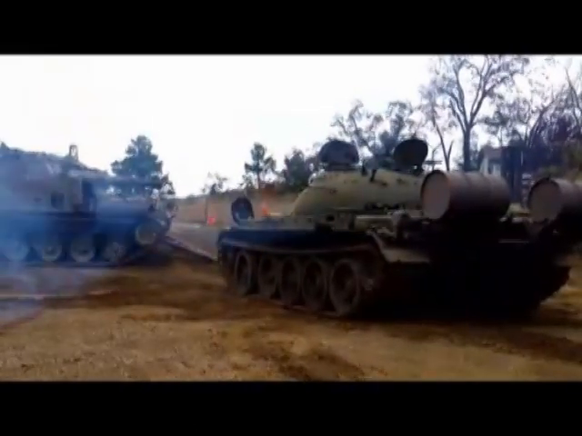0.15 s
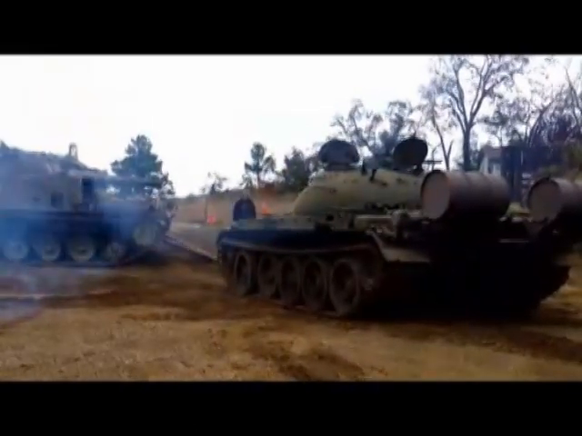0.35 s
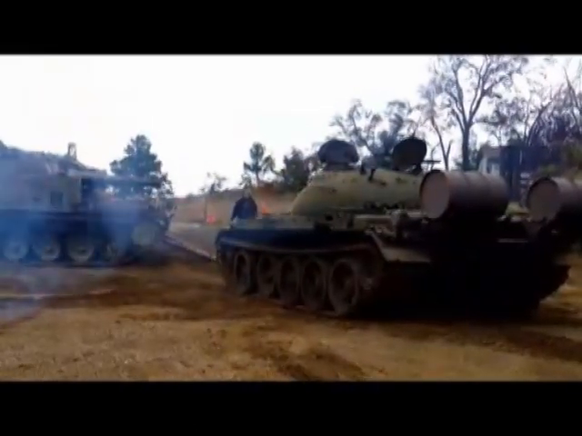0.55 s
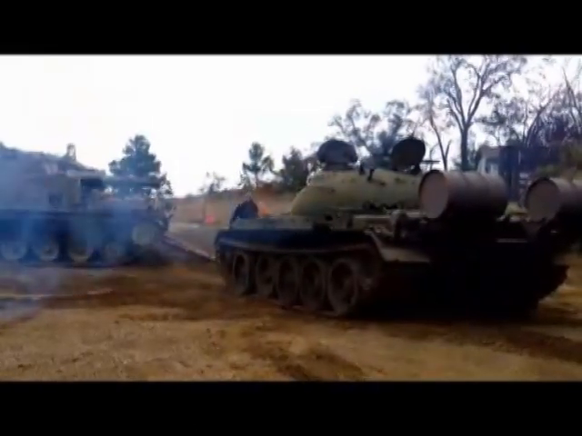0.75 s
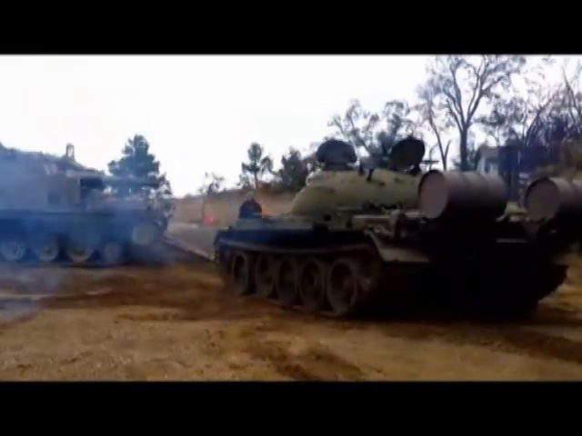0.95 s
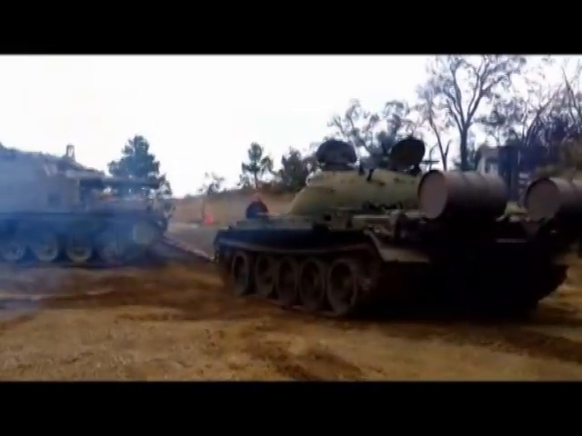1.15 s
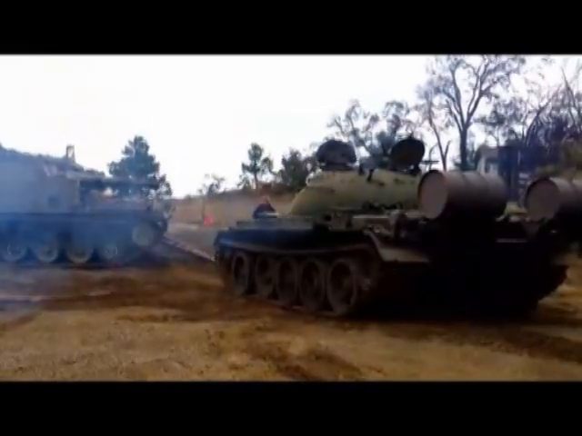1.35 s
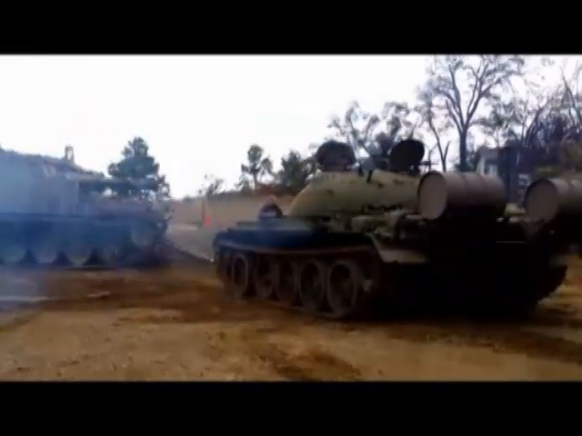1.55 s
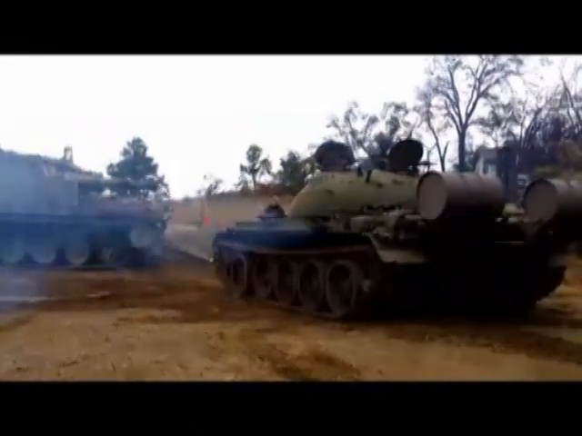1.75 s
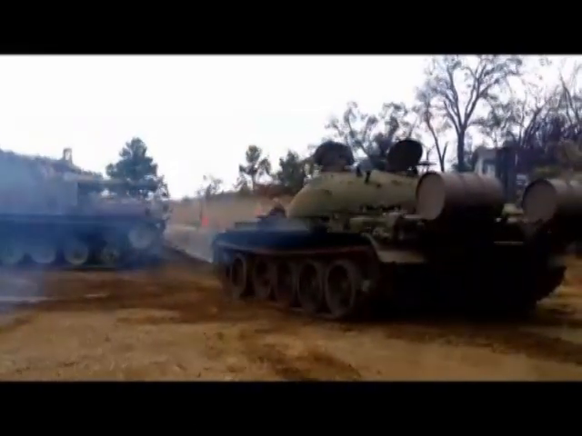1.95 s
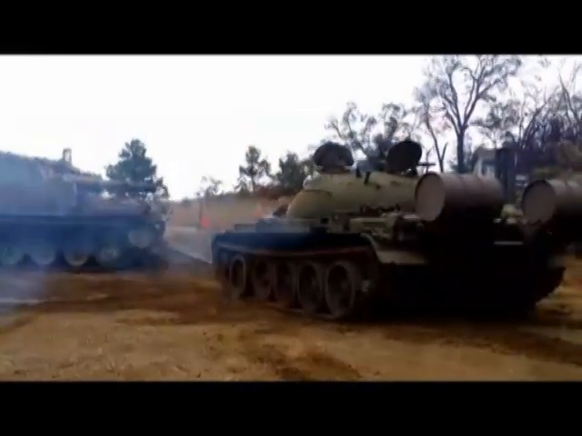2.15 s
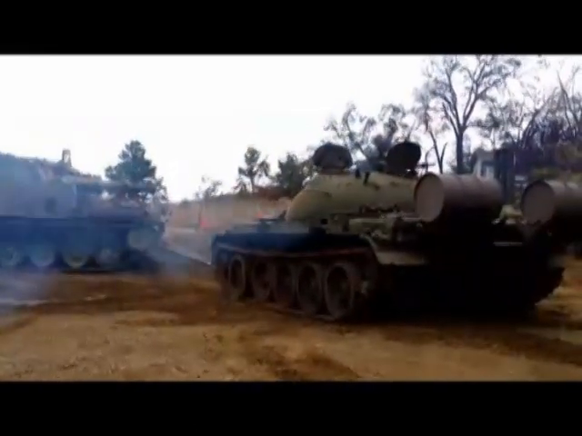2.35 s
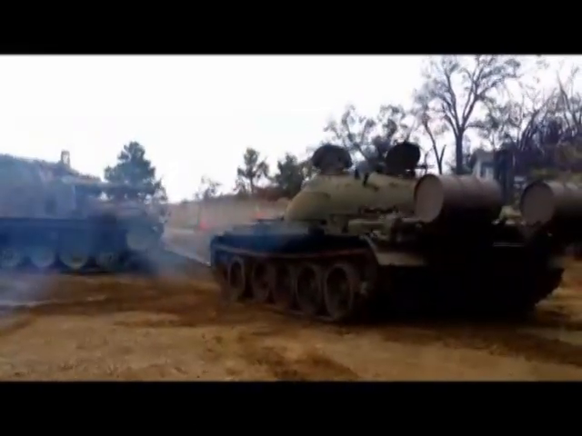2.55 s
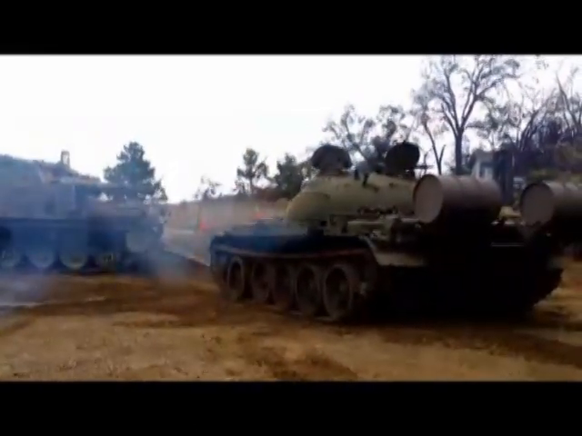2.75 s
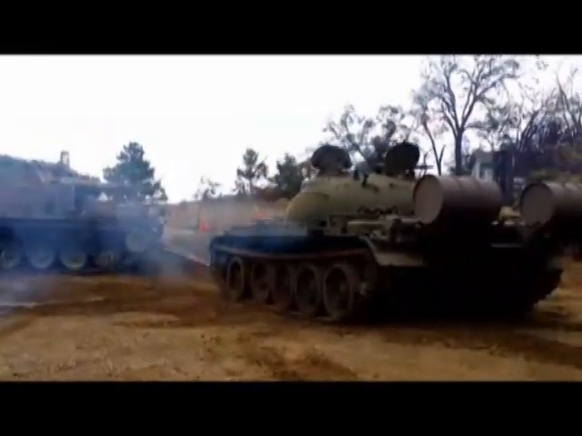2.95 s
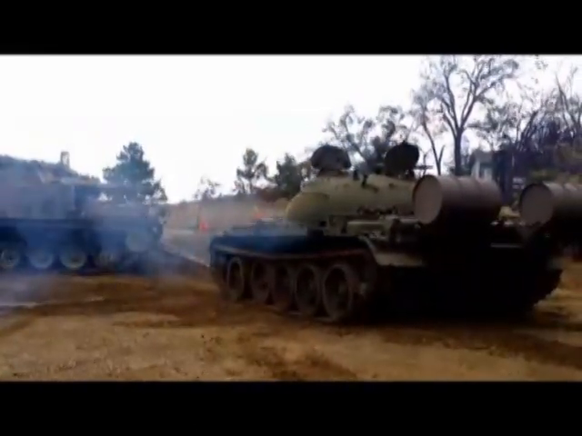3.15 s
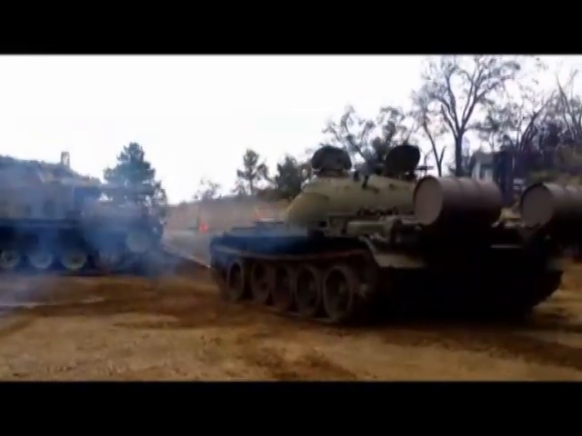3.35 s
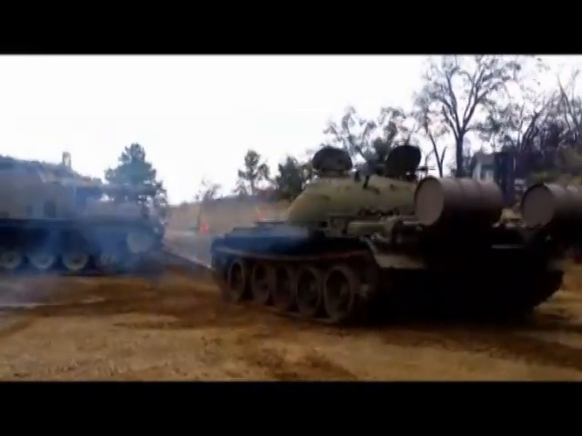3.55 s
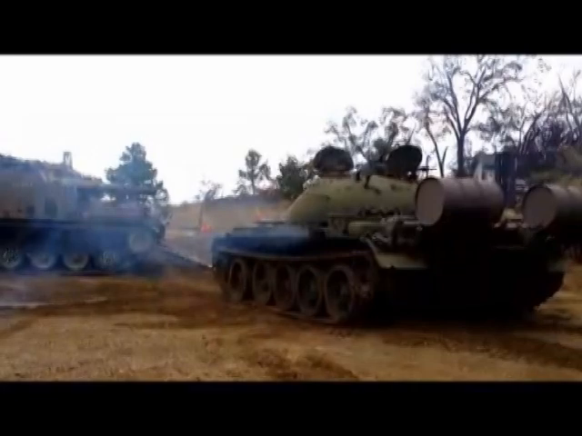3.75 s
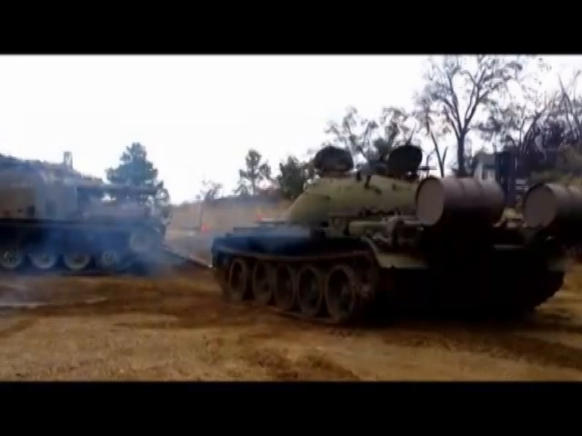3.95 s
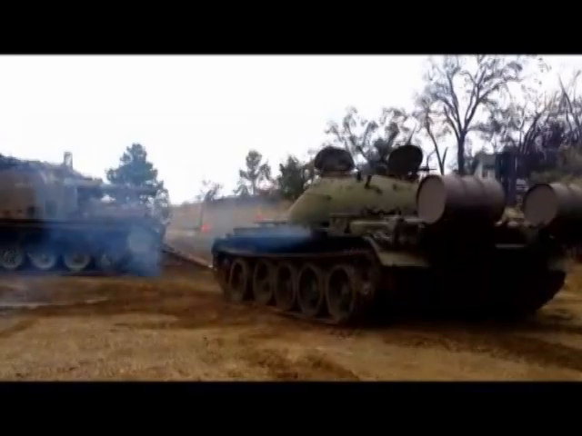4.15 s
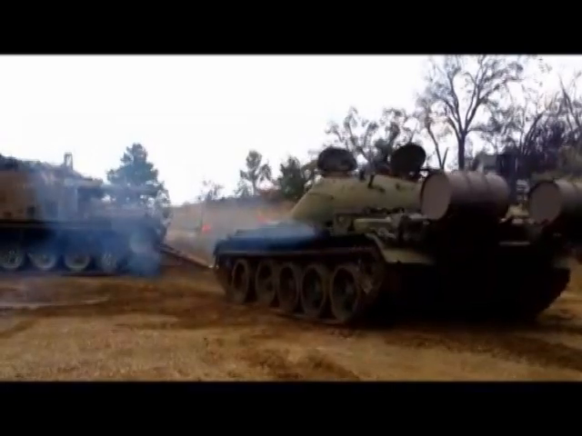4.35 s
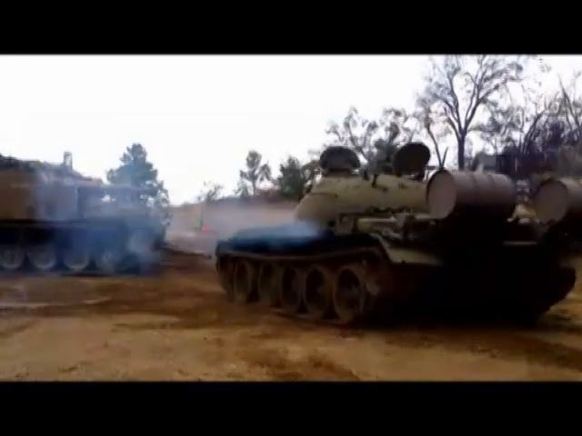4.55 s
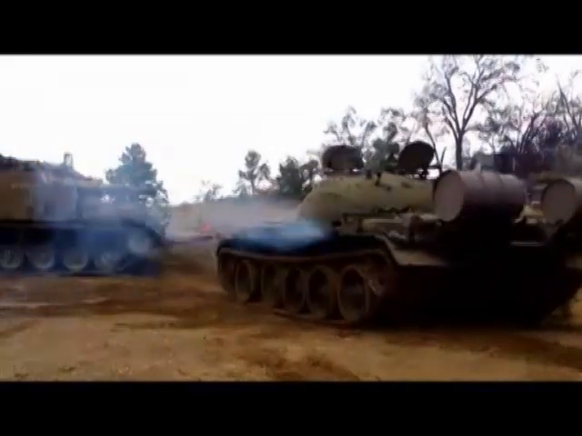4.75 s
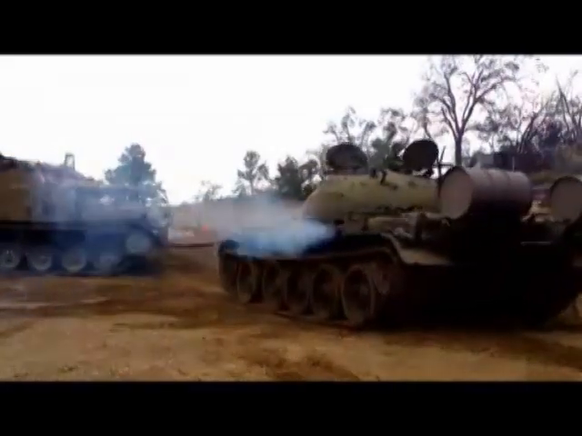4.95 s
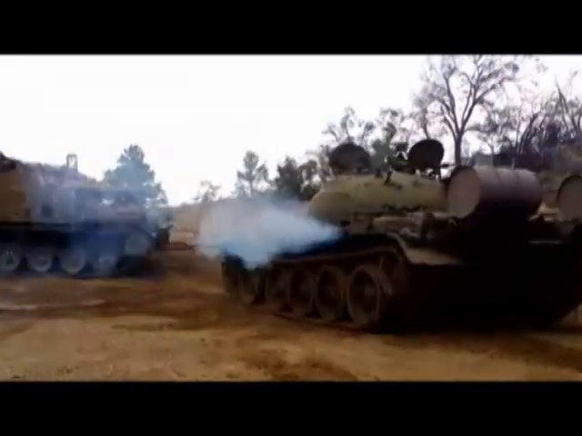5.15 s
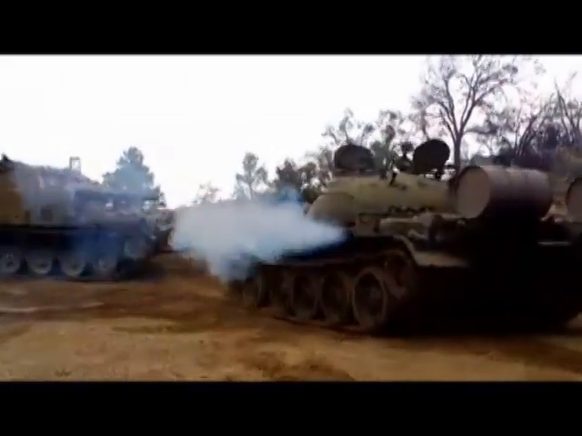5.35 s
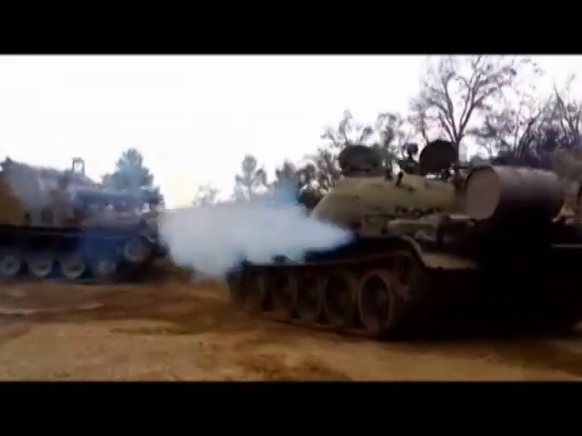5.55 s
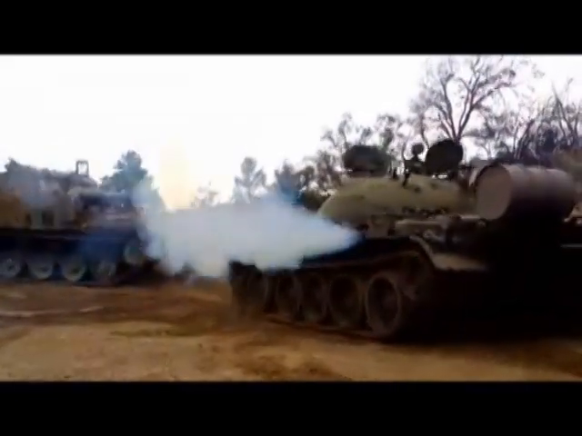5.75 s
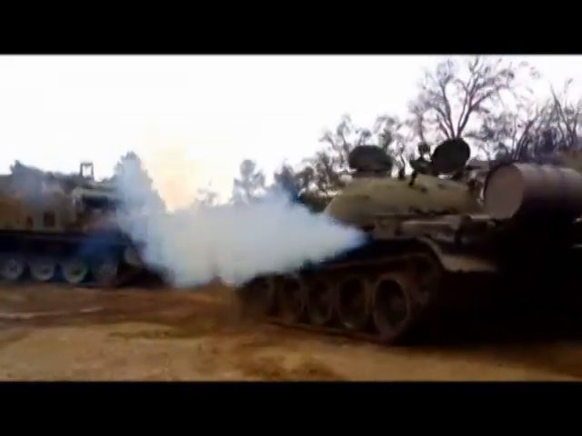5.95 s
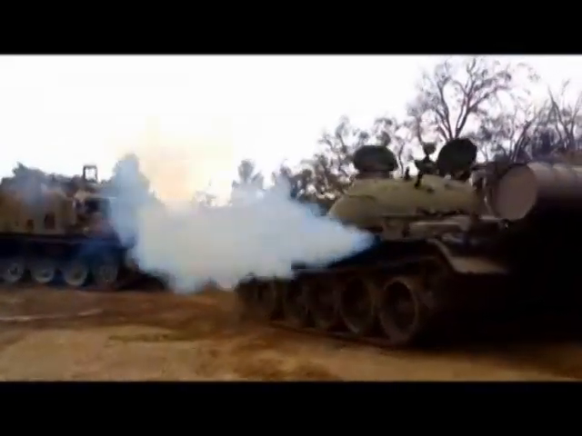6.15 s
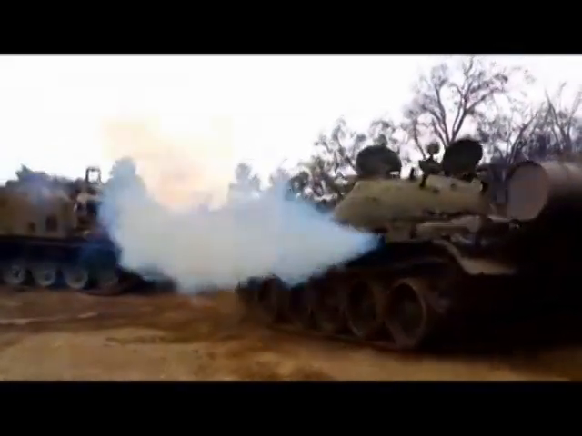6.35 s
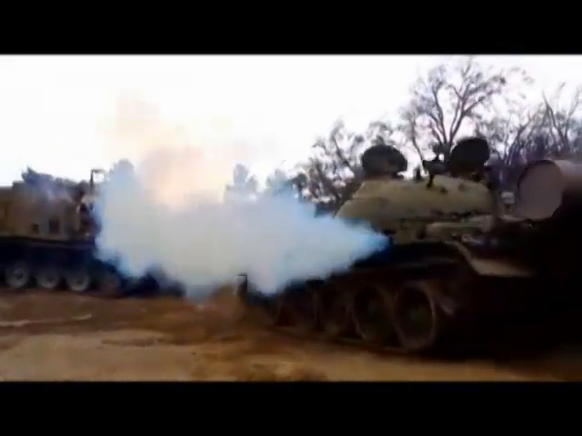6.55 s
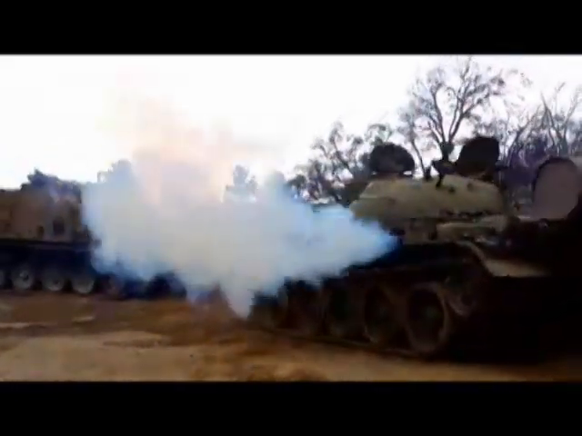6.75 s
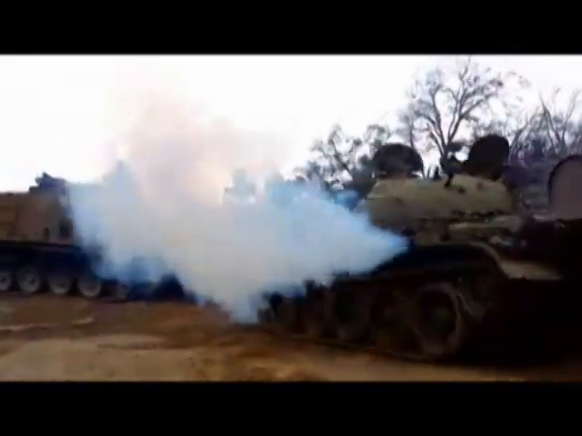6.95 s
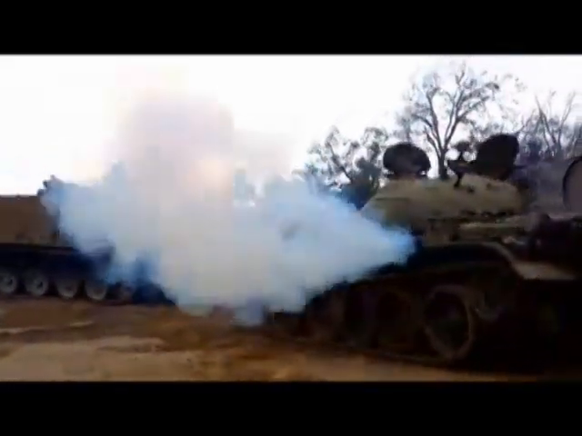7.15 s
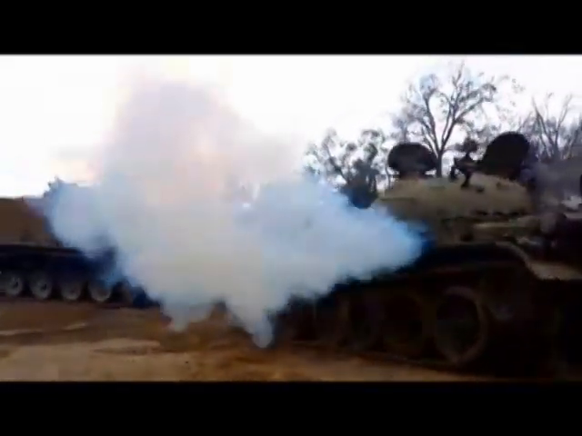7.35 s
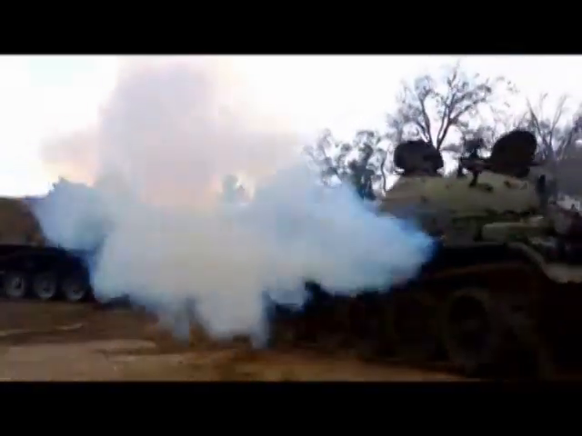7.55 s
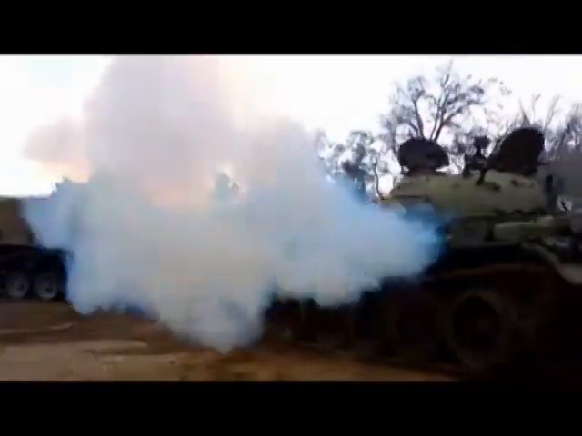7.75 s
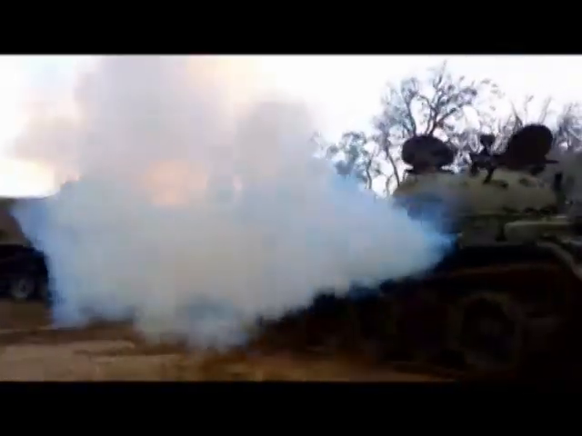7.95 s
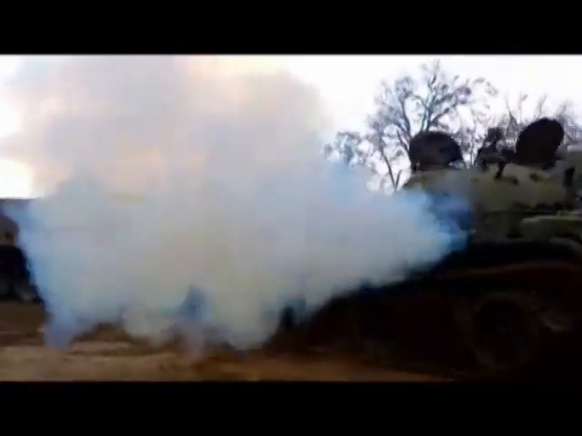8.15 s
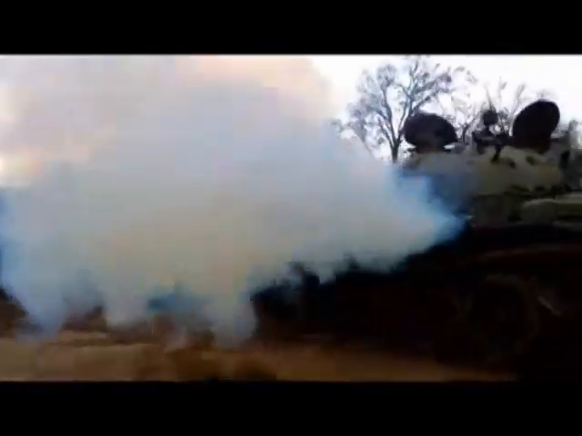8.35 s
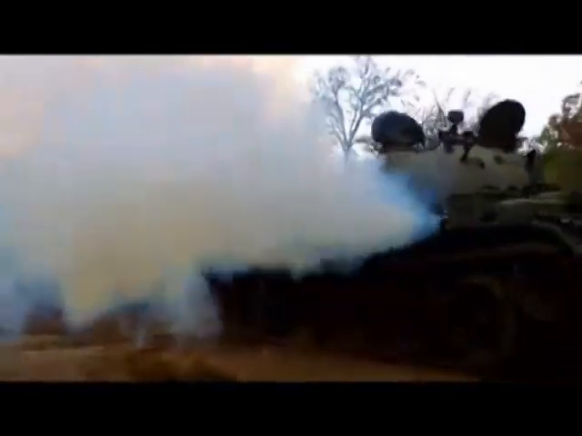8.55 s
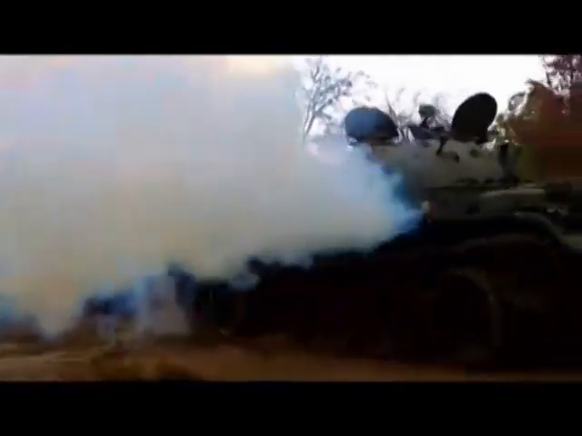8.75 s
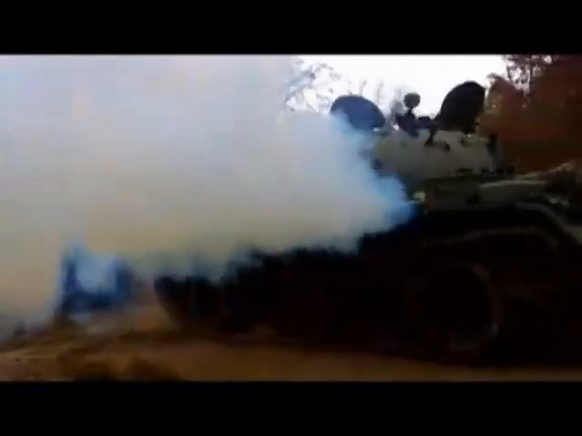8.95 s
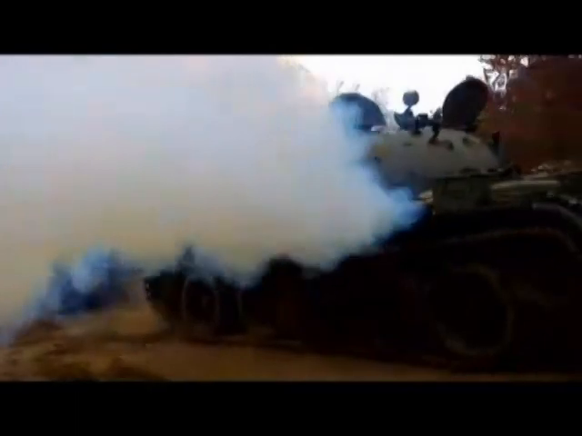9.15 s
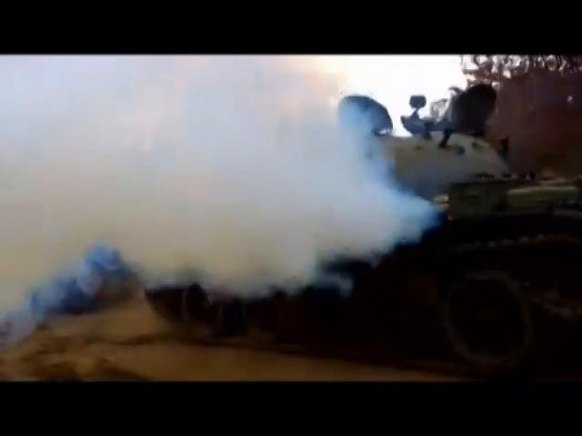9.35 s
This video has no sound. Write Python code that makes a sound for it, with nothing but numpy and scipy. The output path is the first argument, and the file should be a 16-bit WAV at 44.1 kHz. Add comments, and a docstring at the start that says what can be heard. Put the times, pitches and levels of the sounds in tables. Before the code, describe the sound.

Outdoors, a heavy diesel engine hums and lopes at idle, bogs down, scrapes its steel tracks, then climbs steadily in pitch and power with popping exhaust.

```python
"""A dirt yard: a twelve-cylinder diesel in a tracked vehicle idles, sags as the clutch takes load, then revs up
and pulls away. The exhaust boom is a sum of cosines on the orders of the engine cycle, with ringing pops and
a pipe hum. Roar, clatter and hiss are noise pulsed by the firing, shaped by hull resonances and a ground echo
whose delay grows as the vehicle moves off. Rough sines and band noise make the track squeaks and scrapes."""
import sys
import numpy as np
from scipy import signal
from scipy.io import wavfile
from scipy.ndimage import uniform_filter1d

SR = 44100
rng = np.random.default_rng(int(sys.argv[2]) if len(sys.argv) > 2 else 0)


def wav_out(sig):
    """Save sig, one row per channel (or a flat mono array), as 16-bit PCM at SR to the path in sys.argv[1]."""
    wavfile.write(sys.argv[1], SR, np.round(np.clip(np.atleast_2d(sig).T, -1, 1) * 32767).astype(np.int16))


N = 414981
T = np.arange(N) / SR  # s
SLOW = T[::100]  # times of the slow controls (s)

# crank speed: t/s, firing rate f/Hz
FIRING_RATE = [(0.0, 81.59), (0.82, 82.02), (2.0, 79.17), (3.1, 76.49), (3.5, 71.32), (3.86, 66.14),
               (4.15, 66.24), (4.33, 59.0), (4.42, 52.81), (4.56, 56.41), (4.76, 61.58), (4.9, 67.76),
               (5.05, 71.31), (5.4, 77.23), (6.13, 88.38), (6.47, 95.39), (6.89, 97.74), (7.34, 107.36),
               (7.55, 109.48), (8.06, 118.93), (8.7, 132.39), (9.41, 146.11)]
# exhaust effort: t/s, relative level/dB
EXHAUST_EFFORT = [(0, -26), (1.2, -26.5), (3.2, -31), (4.0, -28.5), (4.45, -30), (4.85, -26), (5.25, -29),
                  (5.5, -25.5), (5.8, -23), (7.35, -21.5), (7.8, -16), (8.2, -17), (9.0, -15), (9.41, -21)]
CYLINDERS = 12
# orders, as multiples of the four-stroke cycle rate
ORDERS = [3, 5, 6, 7, 8, 9, 10, 11, 12, 13, 14, 15, 16, 17, 18, 19, 20, 21, 22, 24, 26, 27, 30, 33, 36]
# strength of each order: relative level/dB
ORDER_LEVELS = [-30, -24, -17.5, -25.5, -27, -9.5, -17.5, -16.5, 0.5, -28, -21, -5, -14.5, -12, -25, -9,
                -16, -7, -12.5, -7.5, -10, -7.5, -12, -17.5, -13]
# orders that only uneven cylinders make
STRAY_ORDERS = (8, 9, 10, 11, 13, 14, 16, 18, 19, 20, 22, 26)
# t/s, lope of one bank against the other/dB, unevenness of the cylinders/dB, orders 17-21/dB, orders above/dB
UNEVENNESS = [(0, -5.5, -27, -6, -4), (1.5, -6, -22, -1.5, -7.5), (2, -1, -15, 2.5, -12),
              (3.1, 3, -16, 1.5, -17), (3.6, 9, -6, -3, -14), (4.15, 5, -3, -5.5, -8),
              (4.45, -2, -9, -8, -14), (4.85, 8, -7, -6.5, 1.5), (5.3, 10, -6, -3, -8),
              (5.8, 4, -13, -9, 0), (6.3, 6, -16, 3, -2.5), (7.35, 5, -3.5, 2.5, -1.5),
              (7.7, 2, -9.5, -11.5, -2), (8.4, 2.5, -3.5, -5.5, -7), (8.9, 1, -5, -9.5, -10),
              (9.41, -1, 6, -13, -17)]
# response of exhaust pipe and microphone bass: f/Hz, relative level/dB
PIPE_RESPONSE = [(25, -9), (40, -3), (55, -12), (68, -8), (82, -3.5), (97, 0), (111, -0.5), (125, -3),
                 (140, -13), (160, -21.5), (185, -32), (200, -25.5), (212, -20.5), (224, -13), (240, -24.5),
                 (290, -33)]
START_TURN, WEAK_TURN = -.112, .32  # position at the start, and of the weakest cylinder (cycles)
# the governor hunts at idle, in step with the crank, and all but stops as the throttle opens: t/s, depth (0-1)
HUNT_DEPTH = [(0, .7), (1.2, .85), (3.2, .8), (3.7, .5), (4.5, .5), (5, .01)]
# swings per cycle, push (cycles), swing of level (share)
HUNT_PER_TURN, HUNT_PUSH, HUNT_SWING = .82, .0051, .26
SAG_DB, SAG_S, SAG_WIDTH_S = -5, 4.8, 1  # order 15 fades while the engine labours
LOW_LAG = .27  # phase lag per order under 12 (radians)
LABOUR_LEAD, LABOUR_S, LABOUR_WIDTH_S = 1.5, 4.35, 1.5  # lead over order 12 under strain (radians), its time
# the loud cylinders: place in the cycle (cycles), relative level/dB
LOUD_CYLINDERS = [(0.086, -5), (.417, -2.5), (0.788, -1)]
# cracks against the roar grow with the exhaust effort above idle
CRACK_DB, CRACK_SHARE, IDLE_DB = -11.5, 0.43, -26
# noise before the swells: t/s, roar level/dB, then against the roar: rumble/dB, hiss/dB, fizz/dB
NOISE_LEVELS = [(0, -48.5, 1, -15, -26), (1.4, -47.5, -.5, -15, -26), (2.8, -46, -0.5, -15.5, -26),
                (3.4, -45.5, 1, -16.5, -26), (4.6, -41.5, -1, -17, -28.5), (5.3, -39.5, -0.5, -13, -24),
                (5.75, -40, -1, -11.5, -21.5), (7.0, -42.5, -1, -10.5, -23.5), (7.6, -39.5, -5, -12, -20.5),
                (8.4, -39.5, -4, -16, -22), (8.95, -37, -4.5, -16, -30), (9.41, -37.5, -2.5, -16.5, -24)]
# rumble, roar, clatter, hiss, fizz: lower f/Hz, upper f/Hz
NOISE_BANDS = [(170, 400), (400, 1500), (1500, 3000), (3000, 7000), (7000, 15500)]
CLATTER_DB, CLATTER_SHARE, HISS_REST_DB = -11, 0.19, -10  # clatter against the roar follows the hiss in part
# hull and engine deck: f/Hz, relative spectral level/dB
HULL_SPECTRUM = [(30, -16), (60, -15), (110, -4), (160, -7), (230, -9.5), (330, -12), (460, -20),
                 (860, -15), (1050, -23), (1830, -30.5), (3250, -34.5), (5100, -35), (5800, -41.5),
                 (15600, -60.5)]
# resonances added to the hull: f/Hz, width/Hz, lift/dB
PANEL_RESONANCES = [(210.7, 29, 3.5), (306, 12, 0), (1307, 316, 6.5), (1802, 250, 4.5), (2183, 380, 7.5),
                    (3880, 520, 2), (4820, 230, 1.5), (7340, 790, 3.5), (9570, 700, 4), (11900, 800, 5)]
# ground echo: t/s, delay/ms, share of the direct sound
GROUND_ECHO = [(0, 1.17, 0.12), (5.5, 1.16, 0.14), (6.4, 1.2, 0.42), (8.4, 1.474, 0.26), (9.41, 2.03, 0.31)]
# coherence: f/Hz, share that the two microphone ports hear alike
PORT_COHERENCE = [(60, 0.96), (200, 1), (400, 0.9), (800, 1), (1200, 0.68), (1700, 0.75), (3000, 0.59),
                  (7000, 0.52), (15000, 0.43)]
# level difference: f/Hz, left minus right/dB
PORT_LEVEL_DIFFERENCE = [(200, -0.5), (380, 0.2), (700, 1), (1290, -3), (2380, -3), (4400, -3),
                         (8120, -1.5), (15000, -4)]
# phase difference: f/Hz, lead of the left port/rad
PORT_PHASE_LEAD = [(150, 0), (400, 0.25), (800, -0.85), (1460, -1.07), (2410, -0.7), (2840, 0),
                   (3360, -2.5), (3900, -1.2), (6000, -1.1), (10600, -1.4), (15200, 0.3)]
# the treble shifts between the ports as the vehicle turns: t/s, added left phase/rad
TURN_PHASE = [(5, -0.12), (6.3, -1.19)]
TURN_ABOVE_HZ = 3400
# exhaust pops: t/s, relative level/dB, ring f/Hz
EXHAUST_POPS = [(1.484, -36, 805), (2.546, -37.5, 770), (3.375, -42, 686), (3.568, -37, 760),
                (4.276, -36, 759), (4.333, -40, 876), (4.501, -44, 860), (6.221, -30, 815),
                (6.304, -30, 732), (6.432, -26.5, 733), (6.517, -30.5, 890), (6.557, -28, 760),
                (6.637, -32, 740), (6.683, -31, 746), (6.729, -35, 800), (6.763, -28, 664),
                (6.805, -24.5, 750), (6.93, -35, 764), (7.012, -33, 780), (7.123, -31, 756),
                (7.167, -33, 717), (7.281, -29, 754), (7.352, -32, 587), (7.501, -29, 730),
                (7.575, -29, 750), (7.685, -33, 743), (7.785, -26.5, 720), (7.893, -27.5, 745),
                (7.927, -34, 810), (8.03, -30.5, 770), (8.129, -27.5, 760), (8.195, -29.5, 754),
                (8.23, -29, 725), (8.293, -33, 770), (8.422, -31, 708), (8.456, -28.5, 700),
                (8.517, -33, 643), (8.546, -40, 690), (8.576, -33, 563), (8.612, -34, 1000),
                (8.699, -35, 568), (8.756, -31, 716), (8.847, -26.5, 800), (8.907, -31, 1030),
                (8.933, -31, 780), (8.964, -38, 690), (9.02, -25.5, 810), (9.054, -36, 650),
                (9.081, -32, 700), (9.136, -31, 596), (9.186, -26, 560), (9.224, -30, 890),
                (9.251, -30, 615), (9.292, -25, 570), (9.384, -33, 583)]
POP_S = 0.0014  # rise of a pop (s)
# a high engine order hums at the exhaust pipe's 110 Hz peak while the engine labours
PIPE_HUM_HZ, PIPE_HUM_FROM_S, PIPE_HUM_TO_S = 110, 4.3, 4.7
PIPE_HUM_DB, PIPE_HUM_RISE_DB_PER_S, PIPE_HUM_FALL_DB_PER_S = -36.5, 22.5, 32
# bands of roar that swell, slide and fade, probably sound off the ground interfering:
# start t/s, end t/s, start f/Hz, end f/Hz, width/Hz, lift/dB
SLIDING_SWELLS = [(6.65, 8.35, 2470, 2100, 250, 5), (5.8, 7.4, 2470, 2370, 180, 7),
                  (5.37, 6.67, 4500, 4300, 250, 6.5), (7.9, 9.13, 2550, 2420, 180, 5),
                  (8.9, 10.15, 2380, 2020, 170, 10.5), (4.6, 6.3, 4740, 4450, 410, 4.5),
                  (5.25, 5.8, 3750, 3840, 320, 4.5), (5.2, 6.9, 5600, 5900, 630, 4),
                  (4.3, 5.17, 350, 316, 74, 5), (5.14, 6.9, 1950, 2000, 130, 5),
                  (5.04, 8.6, 470, 473, 166, 5.5), (8.67, 10.4, 464, 690, 100, 6),
                  (6.4, 7.8, 11900, 12100, 1500, 4)]
# decay (s), spread (dB), swing over a third of the cycle (dB), steady part against the gate's deviation
RAP_S, RAP_SPREAD_DB, RAP_THIRD_DB, RAP_REST = .006, 3, 4, .6
# wide scrapes of track steel: t/s, relative level/dB, t60/s
TRACK_SCRAPES = [(4.496, -54, .1), (4.705, -52, 0.17), (4.75, -50, 0.11), (4.791, -47, .1),
                 (4.813, -45, 0.13), (4.895, -51, .2), (5.015, -52, .12), (5.083, -48, 0.064),
                 (5.302, -59, 0.089), (5.369, -56, .08), (5.393, -50, .08)]
# track links squeak as they take tension: t/s, relative level/dB, top ring f/Hz
LINK_SQUEAKS = [(4.693, -65, 13900), (4.755, -57, 13850), (4.79, -53, 14100), (4.824, -56, 14050),
                (4.85, -58, 14100)]
# modes of a link: share of the top ring's pitch, relative level/dB, t60/s
LINK_MODES = [(1, 0, .1), (.885, -17, .25), (.727, -13, .25)]
# one link knocks home: t/s, relative level/dB, ring f/Hz, t60/s
LINK_KNOCK = (4.8134, -45, 3450, .06)
EDGE_HZ = 15650  # upper band limit of the recorder


def gain_of(db):
    """Decibels are twenty times the logarithm of an amplitude ratio; this inverts them."""
    return 10 ** (np.asarray(db) / 20)


def curve(rows, t):
    """Linear interpolation in time gives each column of a table at times t."""
    s, *columns = np.transpose(rows)
    return [np.interp(t, s, c) for c in columns]


def read(points, hz):
    """Linear interpolation on a log-frequency axis gives a spectrum."""
    f, value = np.transpose(points)
    return np.interp(np.log(hz + 1), np.log(f + 1), value)


def bump(x, middle, width):
    """A Gaussian bell of height 1, two standard deviations wide."""
    return np.exp(-.5 * ((x - middle) / (width / 2)) ** 2)


def wander(hz):
    """Low-passed white noise is a slow random drift, here of unit deviation at the times SLOW."""
    low_pass = signal.butter(2, hz, fs=SR / 100, output="sos")
    drift = signal.sosfiltfilt(low_pass, rng.standard_normal(len(SLOW) + 800))[400:-400]
    return drift / drift.std()


def spectrum(x):
    """The short-time Fourier transform: frequencies, times and bins."""
    return signal.stft(x, SR, nperseg=2048, noverlap=1536)


def crank():
    """Integrated firing rate gives cycle position; governor feedback oscillates as a surge of fuel."""
    turns = START_TURN + np.cumsum(curve(FIRING_RATE, T)[0]) / SR / CYLINDERS
    hunt = np.pi + 2 * np.pi * HUNT_PER_TURN * turns
    depth = curve(HUNT_DEPTH, T)[0]
    # more fuel pushes the crank ahead a quarter swing later
    return turns + HUNT_PUSH * depth * np.sin(hunt), depth * np.cos(hunt)


def exhaust(turns, surge):
    """Periodic firing is a Fourier series on the cycle, coloured by the pipe; main orders align on one pulse."""
    cycle_hz = curve(FIRING_RATE, SLOW)[0] / CYLINDERS
    effort_db = curve(EXHAUST_EFFORT, SLOW)[0]
    lope_db, uneven_db, upper_db, top_db = curve(UNEVENNESS, SLOW)
    out = np.zeros(N)
    for order, db in zip(ORDERS, ORDER_LEVELS):
        minor = order % 3 != 0  # these waver more and come from the weakest cylinder
        level_db = effort_db + db + read(PIPE_RESPONSE, order * cycle_hz)
        level_db += (order == 6) * lope_db + (16 < order < 22) * upper_db + (order > 21) * top_db
        level_db += (order in STRAY_ORDERS) * uneven_db + (.4 + 1.2 * minor) * wander(4)
        level_db += (order == 15) * SAG_DB * bump(SLOW, SAG_S, SAG_WIDTH_S)
        phase = (.06 + .2 * minor) * wander(3)
        phase += (order != 12) * LABOUR_LEAD * bump(SLOW, LABOUR_S, LABOUR_WIDTH_S)
        phase += np.pi - 2 * np.pi * order * WEAK_TURN if minor else LOW_LAG * min(order - 12, 0)
        tone = np.cos(2 * np.pi * order * turns + np.interp(T, SLOW, phase))
        out += np.interp(T, SLOW, gain_of(level_db)) * tone
    return np.sqrt(2) * (1 + HUNT_SWING * surge) * out


def load(t):
    """Engine effort sets the strength of the cracks and the depth of the noise pulsing."""
    return gain_of(CRACK_DB + CRACK_SHARE * (curve(EXHAUST_EFFORT, t)[0] - IDLE_DB))


def cracks(turns):
    """Impulse excitation: a click of uneven size and timing as each loud cylinder fires."""
    out = np.zeros(N)
    for place, db in LOUD_CYLINDERS:
        at = np.flatnonzero(np.diff(np.floor(turns - place)) > 0)
        size, slip = rng.standard_normal((len(at), 2)).T
        at = np.clip(at + (slip * .0012 * SR).astype(int), 0, N - 1)
        out[at] += gain_of(db + 1.2 * size)
    return 60 * out * load(T)


def hull_colour(t, hz):
    """Resonant filtering: the hull and its panels shape the noise, band levels follow the noise table."""
    roar_db, rumble, hiss, fizz = curve(NOISE_LEVELS, t)
    clatter = CLATTER_DB + CLATTER_SHARE * (hiss - HISS_REST_DB)
    panels_db = sum(db * bump(hz, f, width) for f, width, db in PANEL_RESONANCES)
    body = gain_of(read(HULL_SPECTRUM, hz) + panels_db)
    # the level that the body alone gives each band
    held_db = [10 * np.log10(np.sum(body[(hz >= lo) & (hz < hi)] ** 2) / len(hz)) for lo, hi in NOISE_BANDS]
    wanted_db = np.array([rumble, 0 * t, clatter, hiss, fizz]) + roar_db - np.array(held_db)[:, None]
    middles = np.sqrt(np.prod(NOISE_BANDS, axis=1))
    return body[:, None] * gain_of([read(np.c_[middles, column], hz) for column in wanted_db.T]).T


def roar(turns, surge):
    """Amplitude modulation: firing pulses noise; hull filtering and a delayed ground reflection follow."""
    firing = 0.24 * np.cos(2 * np.pi * CYLINDERS * turns)
    thirds = 0.25 * np.cos(2 * np.pi * 3 * (turns - .087))
    puffs = 1 + load(T) * (firing + thirds)
    rattle = gain_of(np.interp(T, SLOW, 0.88 * wander(50) + 0.94 * wander(13)) + 0.98 * surge)
    noise = rng.standard_normal((2, N))
    hz, t, smooth = spectrum(noise)
    pulsed = spectrum(noise * puffs * rattle)[2]
    rapped = spectrum(noise * raps(turns))[2]
    treble = np.clip(np.log2(hz / 420 + 1e-9) / 3.1, .1, 1)[:, None]  # the treble pulses most
    mixed = smooth + treble * (pulsed - smooth)
    lift_db = swells(hz, t)
    rap_share = np.clip(lift_db / 6, 0, 1) * (hz[:, None] > 1700)  # the high swells rap
    common, private = mixed + rap_share * (rapped - mixed)
    common = common + spectrum(cracks(turns))[2] / (1 + ((hz - 780) / 250) ** 2)[:, None]

    same = np.clip(read(PORT_COHERENCE, hz), -1, 1)[:, None]
    turn_phase = np.outer(hz > TURN_ABOVE_HZ, curve(TURN_PHASE, t)[0])
    left = common * np.exp(1j * (read(PORT_PHASE_LEAD, hz)[:, None] + turn_phase))
    right = same * common + np.sqrt(1 - same ** 2) * private
    colour = hull_colour(t, hz) * gain_of(lift_db)
    delay_ms, share = curve(GROUND_ECHO, t)
    soft = np.clip(share, 0, 1) * np.exp(-hz / 6000)[:, None]  # loose dirt returns less treble
    out = []
    for ear, side in ((left, 1), (right, -1)):
        delay_s = delay_ms * (1 - .02 * side) / 1000
        echo = (1 + soft * np.exp(-2j * np.pi * hz[:, None] * delay_s)) / np.sqrt(1 + soft ** 2)
        out.append(ear * colour * echo * gain_of(side * read(PORT_LEVEL_DIFFERENCE, hz) / 2)[:, None])
    return signal.istft(np.array(out), SR, nperseg=2048, noverlap=1536)[1][:, :N]


def pops():
    """Damped oscillation: air at the pipe mouth swings a few times, then rings briefly."""
    out, t = np.zeros(N), np.arange(600) / SR
    for s, db, hz in EXHAUST_POPS:
        envelope = (t / POP_S) * (np.exp(1 - t / POP_S) + 0.18 * np.exp(-t / .003))
        out[round(s * SR):][:600] += gain_of(db) * envelope * np.sin(2 * np.pi * hz * t)
    return out


def pipe_hum():
    """A pipe resonance favours a high engine order: one wavering low tone that swells, holds and dies."""
    rise_db = PIPE_HUM_RISE_DB_PER_S * np.maximum(PIPE_HUM_FROM_S - T, 0)
    fall_db = PIPE_HUM_FALL_DB_PER_S * np.maximum(T - PIPE_HUM_TO_S, 0)
    db = PIPE_HUM_DB - rise_db - fall_db + np.interp(T, SLOW, 1.7 * wander(6.0))
    return np.sqrt(2) * gain_of(db) * np.sin(2 * np.pi * PIPE_HUM_HZ * T)


def swells(hz, t):
    """Time-varying filtering: Gaussian bands slide in frequency; their lift in dB rises and fades."""
    out = 0
    for start, end, from_hz, to_hz, width, db in SLIDING_SWELLS:
        way = np.clip((t - start) / (end - start), 0, 1)
        middle_hz = from_hz + (to_hz - from_hz) * way
        out = out + db * abs(np.sin(np.pi * way)) ** 0.74 * bump(hz[:, None], middle_hz, width)
    return out


def raps(turns):
    """Exponential decay: a gate of unit power that each firing opens by an uneven amount."""
    at = np.flatnonzero(np.diff(np.floor(CYLINDERS * turns)) > 0)
    thirds = np.cos(6 * np.pi * (turns[at] - LOUD_CYLINDERS[1][0]))
    hits = np.zeros(N)
    hits[at] = gain_of(RAP_SPREAD_DB * rng.standard_normal(len(at)) + RAP_THIRD_DB * thirds)
    gate = signal.lfilter([1], [1, -np.exp(-1 / (RAP_S * SR))], hits)
    gate = RAP_REST + gate / gate.std()
    return gate / np.sqrt(np.mean(gate ** 2))


def links():
    """Friction of steel on steel: narrow rough rings, each set off by a tick, and wide gritty scrapes."""
    out, t = np.zeros((2, N)), np.arange(SR // 5) / SR
    rings = [(s, peak_db + db, share * top_hz, t60)
             for s, peak_db, top_hz in LINK_SQUEAKS for share, db, t60 in LINK_MODES]
    for s, db, hz, t60 in rings + [LINK_KNOCK]:
        shared, left, right, tick = rng.standard_normal((4, len(t)))
        rough = 0.95 + 12.0 * uniform_filter1d(shared + 1.4 * np.array([left, right]), 200)
        ring = rough * np.minimum(t / 0.0019, 1) * np.sin(2 * np.pi * hz * t)
        ring = ring + 0.12 * tick * np.exp(-t / 0.0038)
        out[:, round(s * SR):][:, :len(t)] += gain_of(db - 60 * t / t60) * ring
    band = signal.butter(1, (1700, 9000), "band", fs=SR, output="sos")
    for s, db, t60 in TRACK_SCRAPES:
        grit = signal.sosfilt(band, rng.standard_normal((2, len(t)))) * np.minimum(t / 0.0037, 1)
        out[:, round(s * SR):][:, :len(t)] += gain_of(db - 60 * t / t60) * grit
    return out * gain_of([[-1.5], [1.5]])  # stronger at the right port


def scene():
    """Superposition of the sources; the boom reaches the right port 3 samples before the left."""
    turns, surge = crank()
    boom = exhaust(turns, surge) + pops() + pipe_hum()
    left_boom = np.pad(boom, (3, 0), "edge")[:N]
    return np.array([left_boom, boom]) + roar(turns, surge) + links()


def record(dry):
    """Linear-phase low-pass filtering gives the band limit of the recorder."""
    low_pass = signal.firwin(1023, EDGE_HZ, window=("kaiser", 10), fs=SR)
    padded = np.pad(dry, ((0, 0), (600, 600)), "reflect")
    return signal.oaconvolve(padded, low_pass[None], "same")[:, 600:-600]


dry = scene()
out = record(dry)
wav_out(out)
```